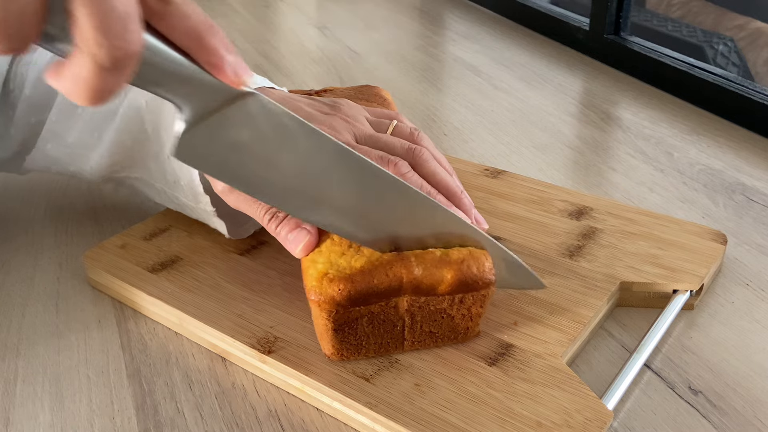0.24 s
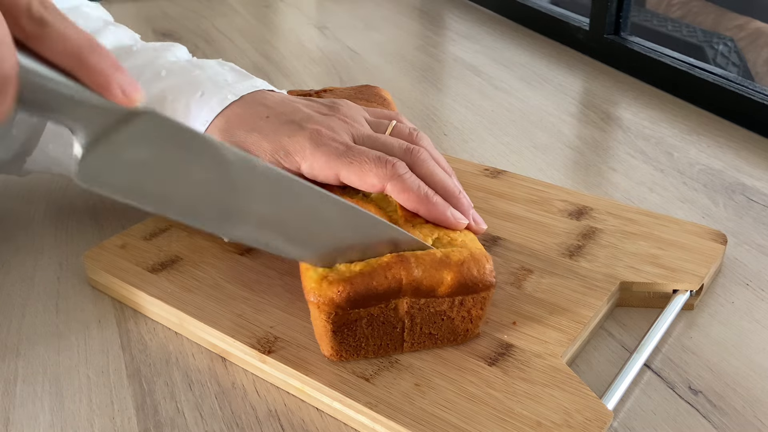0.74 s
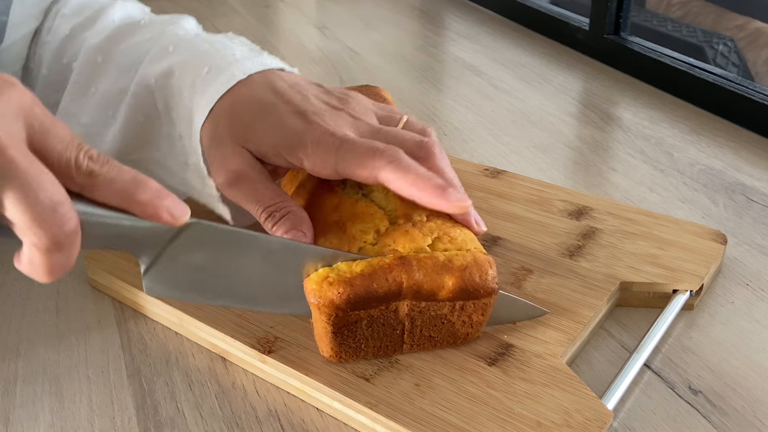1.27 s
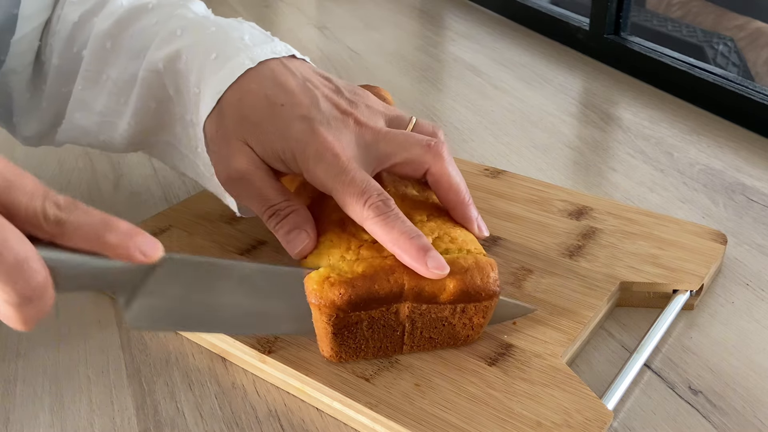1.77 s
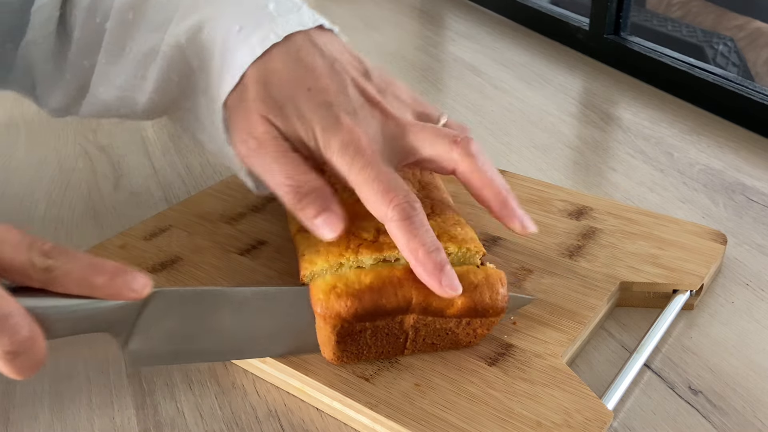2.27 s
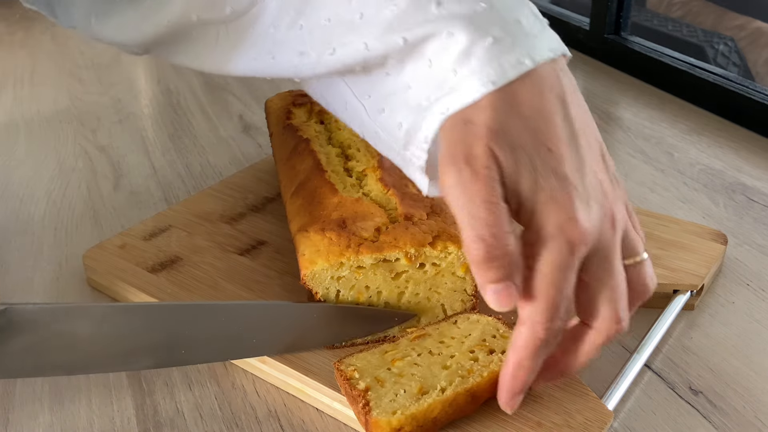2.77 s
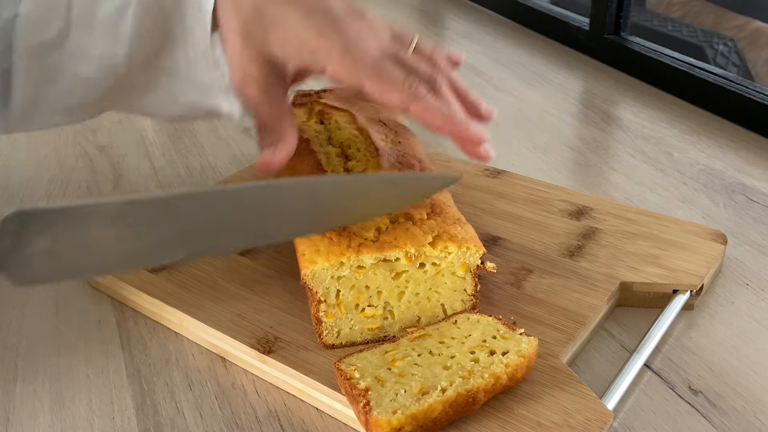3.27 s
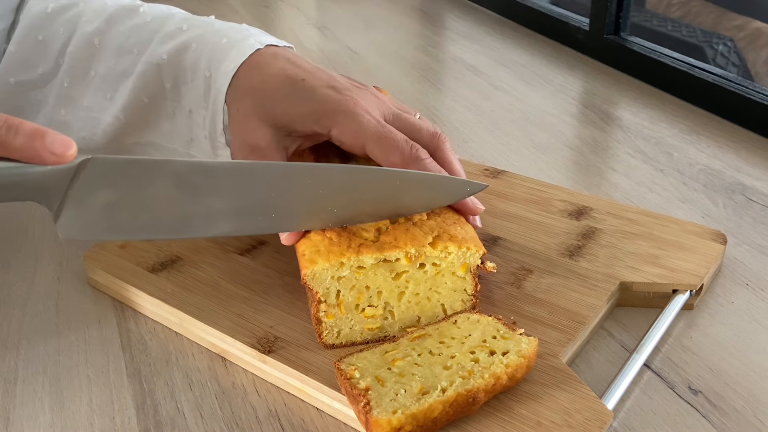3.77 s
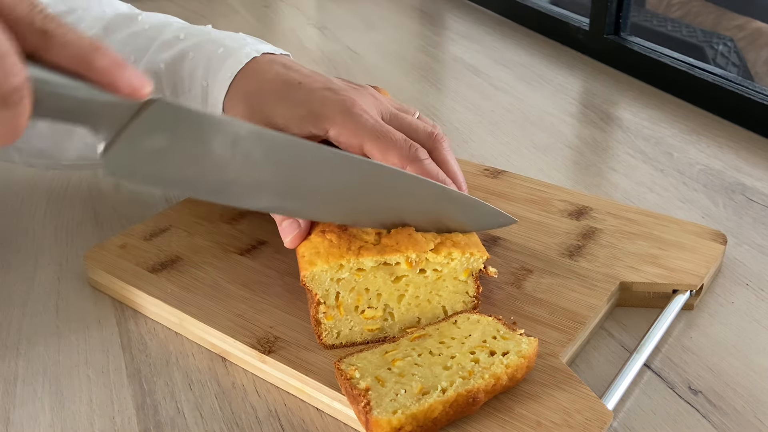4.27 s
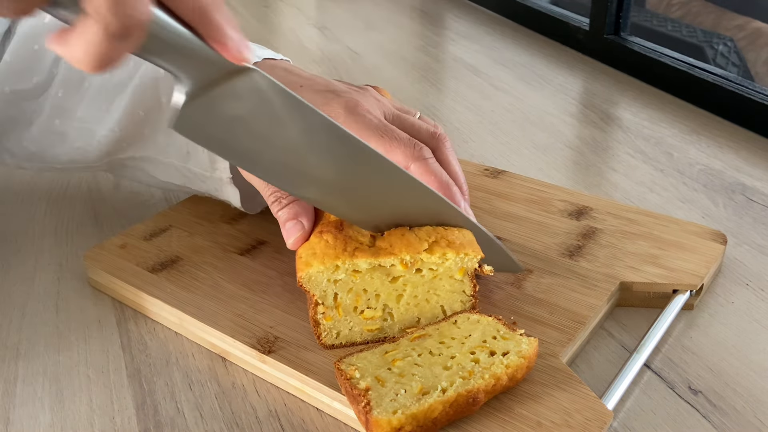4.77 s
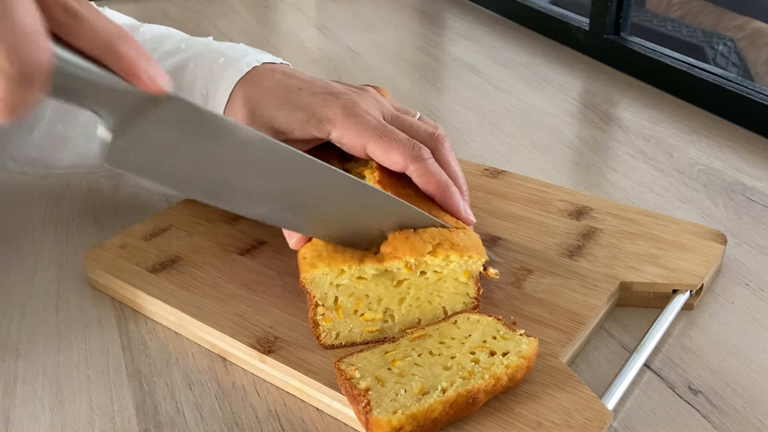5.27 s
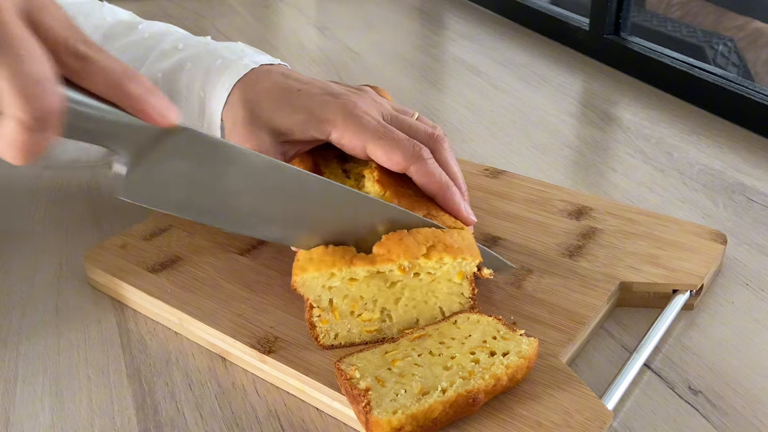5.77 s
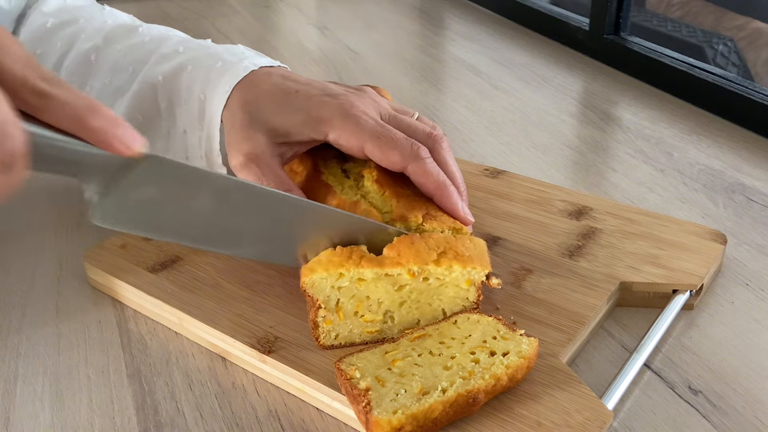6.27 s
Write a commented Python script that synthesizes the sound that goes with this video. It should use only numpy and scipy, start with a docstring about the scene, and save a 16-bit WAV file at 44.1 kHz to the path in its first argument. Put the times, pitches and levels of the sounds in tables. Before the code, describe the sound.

Near stereo microphones pick up rhythmic, grainy knife strokes through cake crust, coarse at first, then softer, with muffled loaf bumps. A faint tap leads into a scraping drag over wood with thin metallic ringing, then damped slice thuds. A quiet gap follows, with only low room rumble and fridge hum. A second run of brisk sawing finishes with a much louder blade knock on the board, briefly echoed by the hard kitchen walls.

```python
"""In a quiet kitchen, a large knife saws through a soft loaf cake on a wooden board, close to a phone.
Fracturing crust grains hiss with blade speed while noise rustles and rumbles as the crumb and rocking loaf.
The edge taps the board, is drawn out along the wood by stick and slip with the blade ringing faintly, and
the slice flops over in damped thuds. The second cut ends in a firm knock of ringing modes. A fridge hums
as wavering sines, and the walls return a diffuse echo."""
import sys
import numpy as np
from scipy import signal
from scipy.fft import rfft, irfft
from scipy.io import wavfile
from scipy.ndimage import uniform_filter1d

SR = 44100
rng = np.random.default_rng(int(sys.argv[2]) if len(sys.argv) > 2 else 0)


def output_pcm(signal):
    """Save a mono or channel-first signal as 16-bit PCM at the path in sys.argv[1].

    Samples are clipped to [-1, 1] before scaling.
    """
    pcm = np.clip(np.atleast_2d(signal).T, -1, 1) * 32767
    wavfile.write(sys.argv[1], SR, np.round(pcm).astype(np.int16))


N = 288414
TIME = np.arange(N) / SR
FREQ = np.maximum(np.arange(N // 2 + 1) * SR / N, 1)
TOP_HZ = 15800


def undb(db):
    """Logarithmic level: decibels become an amplitude gain."""
    return np.exp(np.asarray(db) * (np.log(10) / 20))


def unit(x):
    """Normalisation: the mean power is set to 1."""
    return x / np.sqrt(np.mean(x ** 2))


def shape(points):
    """Spectral envelope: gain joined through (Hz, dB) points on a logarithmic frequency axis."""
    hz, db = np.transpose(points)
    return undb(np.interp(np.log(FREQ), np.log(hz), db))


def resonances(peaks):
    """Superposition of damped resonators, each given as (Hz, width in Hz, dB)."""
    response = 0
    for hz, width, db in peaks:
        detuning = (FREQ ** 2 - hz ** 2) / (FREQ * width)
        response = response + undb(db) / (1 + 1j * detuning)
    return response


def colour(x, response):
    """Linear filtering: the spectrum is multiplied by a response, then scaled to rms 1."""
    return unit(irfft(rfft(x) * response, N))


def walk(rate):
    """Slow random modulation: chance levels, two per cycle of the rate in Hz, joined in time; rms 1."""
    levels = rng.standard_normal(2048)
    return unit(np.interp(TIME * rate * 2, np.arange(len(levels)), levels))


def grains(rate, spread_db):
    """Shot noise: tiny fractures at random moments, rate per second, with random sign and uneven size."""
    happens = rng.random(N) < rate / SR
    sign = rng.choice([-1, 1], N)
    size = undb(spread_db * np.minimum(rng.standard_normal(N), 2))
    return happens * sign * size


def ring(modes):
    """Modal decay: (Hz, dB, t60 in s) modes die away, neighbours in opposite phase; peak 1."""
    t = TIME[:SR // 2]
    y = 0
    for k, (hz, db, t60) in enumerate(modes):
        decay = np.exp(-np.log(1000) * t / t60)
        y = y + (-1) ** k * undb(db) * np.sin(2 * np.pi * hz * t) * decay
    return y / np.abs(y).max()


def soften(x, contact_s):
    """Finite contact time: a soft contact spreads the blow and dulls it; peak 1."""
    t = TIME[:SR // 20]
    y = signal.fftconvolve(x, t * np.exp(-t / contact_s))
    return y / np.abs(y).max()


def add(track, s, sound):
    """Superposition: a sound is summed into the track at a time in seconds."""
    i = max(int(s * SR), 0)
    track[i:i + len(sound)] += sound[:N - i]


def glide(t, length_s, attack_s, release_s):
    """Kinematics of a hand movement: speed from 0 to 1 gathers, holds and comes to rest."""
    nearest_end = np.minimum(t / attack_s, (length_s - t) / release_s)
    return np.sin(np.pi / 2 * np.clip(nearest_end, 0, 1))


def blade(fractures, peaks, wander_db, wander_hz):
    """Moving excitation: contact slides along the steel, so each steep resonance swells on its own."""
    out = 0
    for hz, width, db in peaks:
        band = signal.iirpeak(hz, hz / width, fs=SR)
        once = signal.lfilter(*band, fractures)
        twice = signal.lfilter(*band, once)
        out = out + twice * undb(db + wander_db * walk(wander_hz))
    return unit(out)


def patchy(x, response, depth_db, rate_hz, count):
    """Independent band modulation: with uneven crust, each stretch of the spectrum flickers on its own."""
    spectrum = rfft(x) * response
    centres = np.sqrt(np.linspace(0, TOP_HZ, count))
    out = 0
    for own in np.eye(count):
        overlap = np.interp(np.sqrt(FREQ), centres, own)
        out = out + irfft(spectrum * overlap, N) * undb(depth_db * walk(rate_hz))
    return unit(out)


# Spectrum of the room rumble. Each row: frequency in Hz, relative level in dB.
AIR_SPECTRUM = [(18, -37), (32, -16), (48, -6), (65, -1), (100, -1.5), (160, -4), (300, -10.5),
                (500, -14.5), (750, -20), (1300, -37), (2500, -43), (5000, -46.5), (12000, -56),
                (15000, -67)]
# Partials of the fridge hum. Each row: mean frequency in Hz, mid level in dB rms.
FRIDGE_PARTIALS = [(48.4, -62), (101, -58.5), (344.5, -70)]


def kitchen(floor_db=-56, bass_likeness=0.56):
    """Spatial coherence: rumble is partly alike on both sides in the bass; the hum wavers in pitch and level."""
    likeness = bass_likeness / (1 + (FREQ / 260) ** 2)
    mid, side = rfft(rng.standard_normal((2, N))) * shape(AIR_SPECTRUM)
    mid, side = mid * np.sqrt(1 + likeness), side * np.sqrt(1 - likeness)
    air = unit(irfft(np.array([mid + side, mid - side]), N)) * undb(floor_db + 0.2 * walk(6.6))
    hum = 0
    for hz, db in FRIDGE_PARTIALS:
        level = undb(db + 2 * walk(5)) * np.sqrt(2)
        phase = 2 * np.pi * np.cumsum(hz + 2.232 * walk(8.03)) / SR
        hum = hum + level * np.sin(phase)
    return air + hum


# Sawing strokes. Each row: start in seconds, length in seconds, then relative levels in dB of
# the crust hiss, the crumb rustle and the push that rocks the loaf.
SAW_STROKES = [(.005, 0.19, -58, -70, -55), (0.218, .145, -60, -79, -76), (0.399, 0.14, -59, -60, -51.5),
               (0.566, 0.15, -63, -64, -55.5), (0.726, .17, -62, -66, -60.5),
               (0.904, 0.12, -71, -73, -49.5), (1.056, .26, -68.5, -67.5, -51),
               (1.281, 0.17, -70.5, -65.5, -50), (1.542, 0.13, -68, -70, -51),
               (1.737, .117, -72.5, -74, -48.5), (1.845, 0.19, -67.5, -72, -46.5),
               (4.131, 0.2, -63.5, -67, -53), (4.369, 0.087, -59, -67.5, -53), (4.519, .18, -56, -64, -56),
               (4.708, 0.16, -60, -65, -47), (4.901, .15, -62.5, -69.5, -52.5),
               (5.089, 0.13, -55.5, -70, -46), (5.235, 0.15, -57, -66.5, -43.5),
               (5.422, 0.13, -60, -69.5, -43.5), (5.567, .153, -63, -70, -50.5),
               (5.735, 0.13, -62, -68, -51), (5.89, 0.17, -63.5, -69, -54), (6.071, .15, -63.5, -72.5, -49),
               (6.243, .21, -63, -64, -48.5), (6.445, 0.13, -68.5, -52.5, -42)]
# Spectra of crust, coarse crust rasp, rustling crumb and rocking loaf.
# Each row: frequency in Hz, relative level in dB.
CRUST_SPECTRUM = [(700, -27), (1500, -7.5), (2000, -1.5), (2600, -1.5), (5500, -1), (7000, 3.5),
                  (9000, -1.5), (12000, 5.5), (14500, -3.5), (16000, 2)]
COARSE_SPECTRUM = [(600, -11.5), (1000, -7), (1400, -7.5), (1900, -11.5), (2600, -15), (5000, -21)]
CRUMB_SPECTRUM = [(150, -5), (350, -4.5), (600, 12.5), (900, 1), (1400, -4), (2000, -9.5), (4000, -30)]
LOAF_SPECTRUM = [(18, -20), (35, 0.5), (55, 5.5), (80, 7.5), (110, 4.5), (160, -1.5), (250, -29),
                 (400, -19.5), (900, -75)]
# Blade resonances deep in the loaf. Each row: frequency in Hz, width in Hz, relative level in dB.
BLADE_IN_LOAF = [(2485, 120, 3), (2820, 330, 1), (3330, 340, -0.5), (4067, 130, 5.5), (4753, 180, 3.5),
                 (5790, 430, -3), (7070, 1500, -3.5), (11210, 350, 1.5), (12700, 260, -2.5),
                 (14700, 370, -8)]
RISE_SHARE = 0.41  # part of a stroke spent speeding up
# coarse rasp against the hiss: it fades to a floor as the blade sinks through the tough heel
HEEL_DB, HEEL_FADE_DB_PER_S, SOFT_CRUST_DB = -2.5, 17, -20.5


def sawing(inertia_s=0.043, press_share=0.27):
    """Fracture noise: crust grains break as fast as the blade moves; crumb rustles and the loaf rocks."""
    hiss, sing, rustle, rumble = np.zeros((4, N))
    usual_db = np.mean(SAW_STROKES, axis=0)[-1]
    for start, length, hiss_db, rustle_db, push_db in SAW_STROKES:
        speed = glide(TIME[:SR // 2], length, RISE_SHARE * length, (1 - RISE_SHARE) * length)
        add(hiss, start, undb(hiss_db) * speed)
        # a harder push rocks the loaf more and drives the steel more
        add(sing, start, undb(hiss_db + press_share * (push_db - usual_db)) * speed)
        add(rustle, start, undb(rustle_db) * speed)
        add(rumble, start, undb(push_db) * speed)
    # the arm cannot start or stop at once
    hiss, sing = uniform_filter1d(np.array([hiss, sing]), int(inertia_s * SR))

    fractures = grains(rate=12000, spread_db=3.5) * undb(1.04 * walk(60))
    crust = patchy(fractures, shape(CRUST_SPECTRUM), depth_db=2.6, rate_hz=32, count=7) * undb(-1.0)
    tough_db = np.maximum(HEEL_DB - HEEL_FADE_DB_PER_S * TIME, SOFT_CRUST_DB)
    coarse = colour(grains(rate=760, spread_db=10.5), shape(COARSE_SPECTRUM)) * undb(tough_db)
    steel_grains = grains(rate=5000, spread_db=6.5)
    steel = blade(steel_grains, BLADE_IN_LOAF, wander_db=4.5, wander_hz=14) * undb(-9.5)
    crumb_grains = grains(rate=800, spread_db=6.0) * undb(2 * walk(25))
    crumb = colour(crumb_grains, shape(CRUMB_SPECTRUM))
    loaf = colour(rng.standard_normal(N), shape(LOAF_SPECTRUM))
    return hiss * (crust + coarse) + sing * steel + rustle * crumb + rumble * loaf


# Soft bumps of loaf and slice on the board, and at 1.797 s the board's thump just after the edge lands. # Each
# row: time in seconds, peak level in dB, frequency of the main mode in Hz, its t60 in seconds.
SOFT_BUMPS = [(.668, -48.5, 529, 0.089), (0.837, -44.5, 116.7, 0.48), (1.162, -41, 99.6, 0.31),
              (1.318, -39, 172.6, 0.27), (1.797, -35, 199.6, 0.078), (1.86, -34, 132, 0.096),
              (1.997, -35, 102.5, 0.14), (2.597, -37, 194.4, 0.21), (2.745, -33, 129.6, 0.15),
              (2.775, -38.5, 80, 0.29), (2.97, -53.5, 338, 0.38), (4.241, -41.5, 106.6, 0.37),
              (5.033, -41.5, 226, 0.22), (5.113, -44, 72, 0.27)]


def bumps():
    """Damped vibration: moist cake settles on the board, and once the board answers the edge, with dull,
    quickly dying thuds."""
    out = np.zeros(N)
    for s, db, hz, t60 in SOFT_BUMPS:
        thud = ring([(hz, 0, t60), (410, -4, .06)])
        add(out, s, undb(db) * soften(thud, contact_s=0.00051))
    return out


# Cracks of breaking crust and ticks of the blade. Each row: time in seconds, peak level in dB,
# centre frequency in Hz, time in seconds for the driving noise to fall to 1/e.
CRACKS = [(.933, -62, 5000, .0034), (1.331, -52.5, 890, 0.011), (1.345, -51.5, 8900, .0034),
          (1.794, -52, 5970, 0.002), (3.268, -58.5, 2400, 0.002), (4.3763, -53, 4000, .0034)]


def ticks():
    """Impulsive release: each crack is a decaying noise burst in a band two octaves wide."""
    out, t = np.zeros(N), TIME[:SR // 8]
    for s, db, hz, decay_s in CRACKS:
        band = signal.butter(1, [hz / 2, min(hz * 2, .45 * SR)], "band", fs=SR)
        burst = rng.standard_normal(len(t)) * np.exp(-t / decay_s)
        crack = signal.lfilter(*band, burst)
        add(out, s, undb(db) * crack / np.abs(crack).max())
    return out


# Landings of the edge on the board. Each row: time in seconds, peak blow in dB, peak tick in dB.
EDGE_LANDINGS = [(1.7921, -44.5, -51.5), (6.3993, -12, -26.5)]
# Modes of the board under a blow, then of the edge meeting the wood.
# Each row: frequency in Hz, relative level in dB, t60 in seconds.
BOARD_MODES = [(102, -8, 0.14), (174, -6, 0.062), (218.5, -13, 0.13), (323, 0.5, 0.047), (416, 3, 0.061),
               (600, -15, 0.075), (649, -10.5, 0.062), (790, -9, 0.051), (848, -20.5, 0.12),
               (1152, -20, 0.03), (1296, -27, 0.077), (1820, -52, 0.088), (2490, -20.5, 0.085)]
EDGE_MODES = [(852, 11, 0.017), (1910, -5, 0.052), (2206, -2.5, 0.02), (2510, -13, 0.019),
              (3400, -35, 0.0056), (4120, -7.5, 0.0096), (7100, -39, .01)]


def knocks(follow_s=0.00203, crunch_db=-19.0, crunch_s=0.015):
    """Impact excitation: the edge ticks, the hand's weight follows, the board booms and crust is crushed."""
    out, t = np.zeros(N), TIME[:SR // 4]
    crunch_spectrum = shape([(200, -3), (600, 6.5), (1100, 7.5), (1380, -6), (1580, -34),
                             (2000, -17), (2800, -9), (3400, -55.0), (9000, -68)])
    crushed = colour(grains(rate=3000, spread_db=-1.0), crunch_spectrum)
    for s, blow_db, tick_db in EDGE_LANDINGS:
        add(out, s, undb(tick_db) * ring(EDGE_MODES))
        add(out, s + follow_s, undb(blow_db) * soften(ring(BOARD_MODES), contact_s=.00006))
        # the bottom crust is crushed between edge and board
        add(out, s + follow_s, undb(blow_db + crunch_db) * crushed[:len(t)] * np.exp(-t / crunch_s))
    return out


# The edge dragged along the board, forward and then back out. Each row: start in seconds,
# length in seconds, then relative levels in dB of board, rasp and blade.
EDGE_DRAGS = [(1.818, 0.24, -49, -59, -66.5), (2.08, 0.626, -51, -59, -59.5)]
# Spectrum of the rasp on the wood. Each row: frequency in Hz, relative level in dB.
RASP_SPECTRUM = [(400, -30), (650, 6.5), (850, 2), (1100, -2.5), (1400, -4), (1900, -8.5), (2800, -13),
                 (5000, -40)]
# Blade resonances with its edge on the board, then drawn clear.
# Each row: frequency in Hz, width in Hz, relative level in dB.
BLADE_ON_BOARD = [(1810, 240, 8), (2330, 300, 9), (3370, 280, 9.5), (4110, 390, 9.5), (4630, 110, 6),
                  (5200, 230, 6), (6800, 1200, 5), (8040, 220, 6), (11260, 390, 12), (14330, 250, -7)]
BLADE_DRAWN_CLEAR = [(1715, 77, 7), (3000, 260, 2.5), (3250, 160, -8), (4120, 110, 8.5), (4460, 93, 4),
                     (4790, 89, 7), (5100, 120, -4), (5800, 150, 8), (7850, 110, 6.5), (8850, 140, -14),
                     (9800, 110, 7.5), (11220, 160, 1), (12750, 140, -5)]
# a drag starts quickly, ends slowly and grows with a power of its speed
DRAG_ATTACK_S, DRAG_RELEASE_S, DRAG_POWER = 0.072, .13, 1.36
CLEAR_AT_S, CLEARING_S = 2.322, .13  # the blade slides clear of the loaf
CLEAR_RING_DB, CLEAR_HISS_DB, CLEAR_RASP_DB = -5, -3, -11.5  # change in the scrape once it is clear
LIFT_AT_S, LIFT_DB_PER_S = 2.51, 67  # the hand takes its weight off the board


def dragging():
    """Stick-slip friction: the edge shakes board and blade, whose resonances change as it comes clear."""
    shake, scrape, sing = np.zeros((3, N))
    for start, length, board_db, rasp_db, blade_db in EDGE_DRAGS:
        drive = glide(TIME - start, length, DRAG_ATTACK_S, DRAG_RELEASE_S) ** DRAG_POWER
        shake += undb(board_db) * drive
        scrape += undb(rasp_db) * drive
        sing += undb(blade_db) * drive
    drawn = np.clip((TIME - CLEAR_AT_S) / CLEARING_S, 0, 1)
    weight = undb(-LIFT_DB_PER_S * np.maximum(TIME - LIFT_AT_S, 0))

    slips = grains(rate=3100, spread_db=5.5) * undb(3.4 * walk(32))
    board_peaks = resonances([(218, 40, -12.5), (308, 49, -3), (409.4, 58, 10.5)])
    board_slope = shape([(60, 18), (150, 1.0), (500, -14.5), (1200, -23), (4000, -38)])
    board = colour(slips, board_peaks * board_slope)
    rasp_grains = grains(rate=2700, spread_db=4.0) * undb(2.0 * walk(35))
    rasp = colour(rasp_grains, shape(RASP_SPECTRUM))

    fibres = grains(rate=8000, spread_db=1.0) * undb(1.2 * walk(50))
    held = blade(fibres, BLADE_ON_BOARD, wander_db=3, wander_hz=11)
    clear = blade(fibres, BLADE_DRAWN_CLEAR, wander_db=3, wander_hz=11)
    steel = undb(-3.5) * (np.sqrt(1 - drawn) * held + np.sqrt(drawn) * undb(CLEAR_RING_DB) * clear)
    hiss = colour(grains(rate=7900, spread_db=-1), shape(CRUST_SPECTRUM))
    steel += undb(-6.5 + CLEAR_HISS_DB * drawn) * hiss
    return shake * weight * board + scrape * undb(CLEAR_RASP_DB * drawn) * rasp + sing * steel


# Echo bands of the room. Each row: centre in Hz, t60 in seconds, relative level in dB.
ROOM_BANDS = [(61, 0.96, -22), (200, 0.85, -6.5), (440, 0.27, -6.5), (705, 0.42, 2), (1290, 0.21, 5.5),
              (2660, 0.19, -1.5), (5270, 0.15, 3.5), (8700, 1, -26), (16000, 0.27, -3.5)]


def echo(x, gap_s=0.0016):
    """Diffuse reverberation: hard walls return noise tails, different on each side, each band decaying alone."""
    t = TIME[:SR * 3 // 4]
    freq = np.maximum(np.arange(len(t) // 2 + 1) * SR / len(t), 1)
    noise, tail = rfft(rng.standard_normal((2, len(t)))), 0
    centres = np.log(np.array(ROOM_BANDS)[:, 0])
    for (hz, t60, db), own in zip(ROOM_BANDS, np.eye(len(ROOM_BANDS))):
        # silent for the gap, then a ramp of the same length
        decay = np.clip(t / gap_s - 1, 0, 1) * np.exp(-np.log(1000) * t / t60)
        band = irfft(noise * np.interp(np.log(freq), centres, own), len(t))
        tail = tail + undb(db) * band * decay / np.sqrt(np.sum(decay ** 2))
    return signal.fftconvolve(x[None], tail, axes=1)[:, :N]


def ports(x, lag_s=0.0002756):
    """Propagation delay: the board lies nearer the right microphone, so the left hears it later."""
    taps = np.arange(-32, 33)
    # a windowed sinc delays by a fraction of a sample
    delay = np.sinc(taps - lag_s * SR) * np.kaiser(len(taps), 2)
    return np.array([np.convolve(x, delay, "same"), x])


def scene():
    """Direct and reverberant fields: the board is heard straight and off the walls, over the room's floor."""
    board = sawing() + bumps() + ticks() + knocks() + dragging()
    return undb(0.73) * ports(board) + undb(-0.5) * echo(board) + kitchen()


def record(dry):
    """Band limiting: the phone cuts the top with a steep low-pass."""
    return signal.sosfilt(signal.ellip(8, .2, 70, TOP_HZ, fs=SR, output="sos"), dry)


dry = scene()
out = record(dry)
output_pcm(out)
```